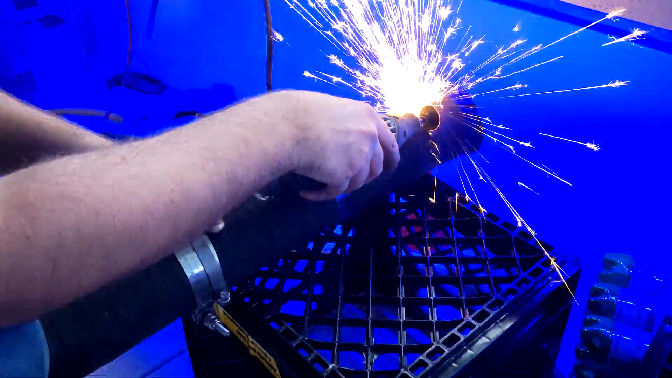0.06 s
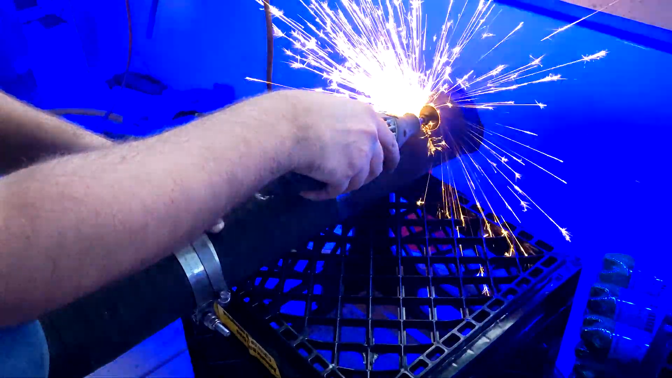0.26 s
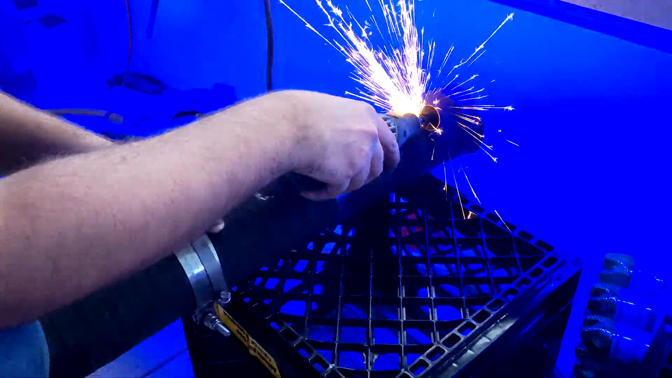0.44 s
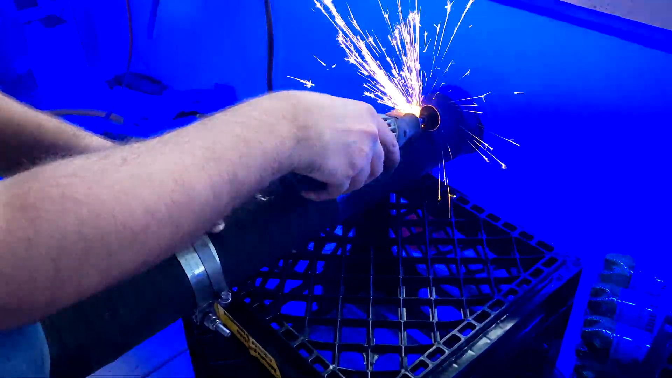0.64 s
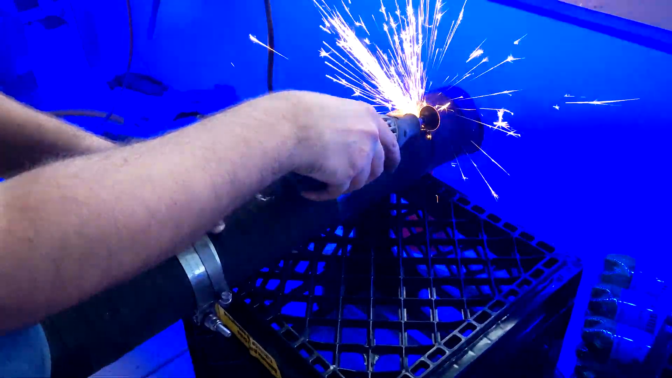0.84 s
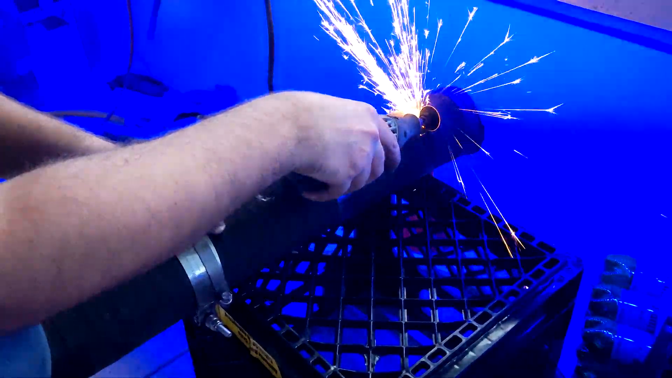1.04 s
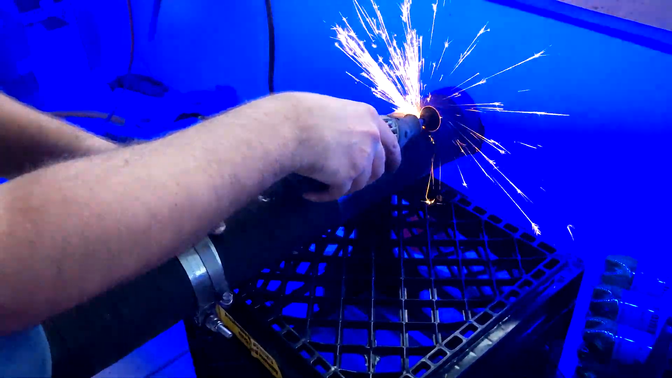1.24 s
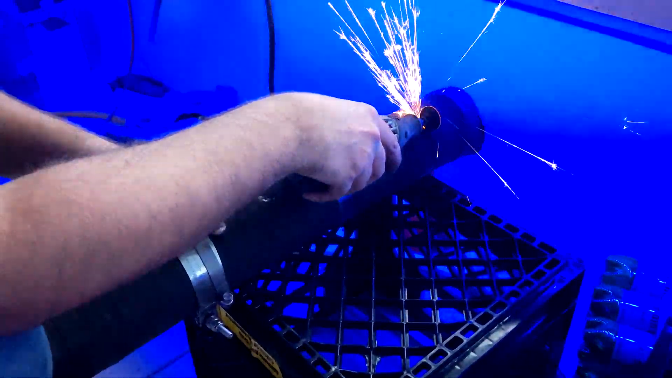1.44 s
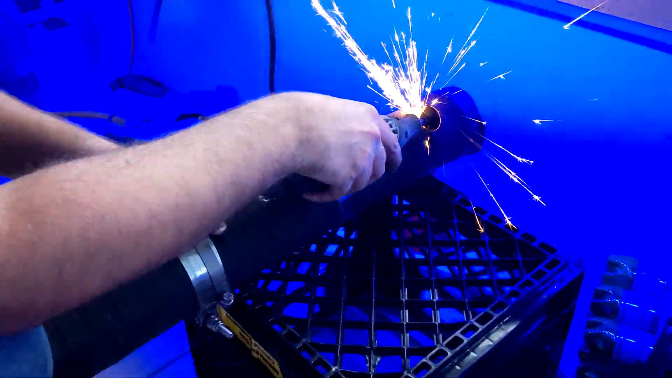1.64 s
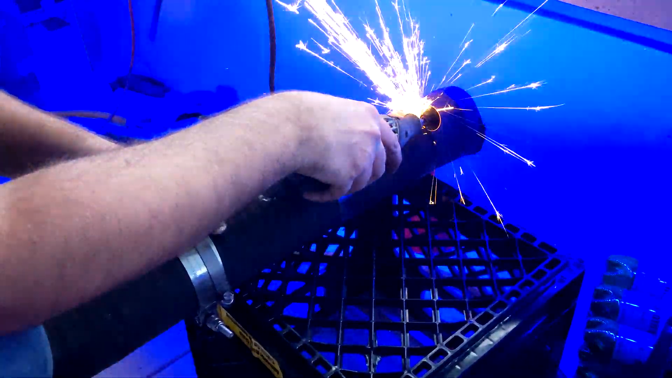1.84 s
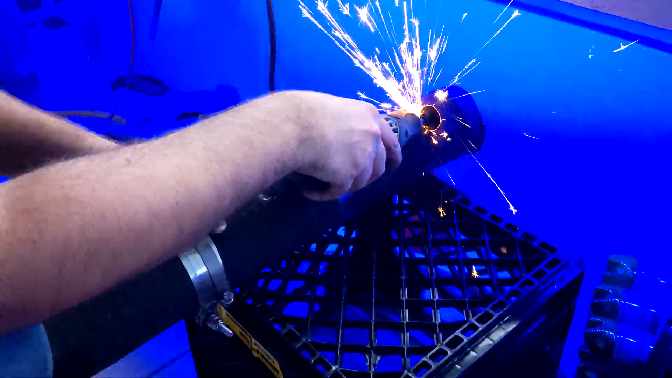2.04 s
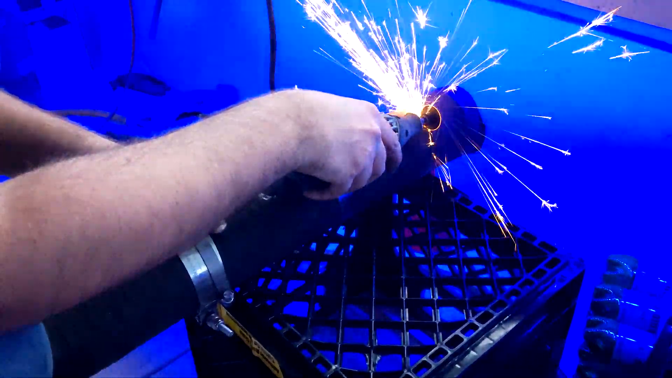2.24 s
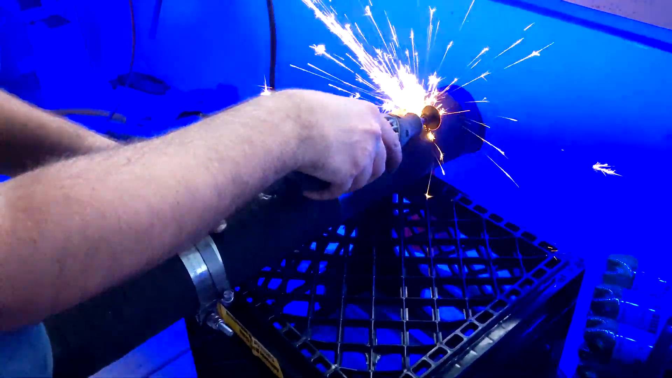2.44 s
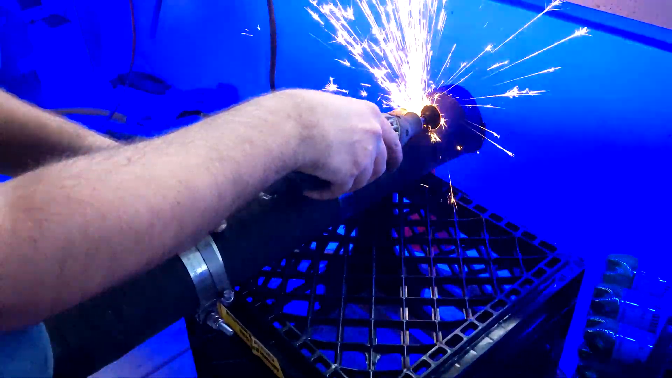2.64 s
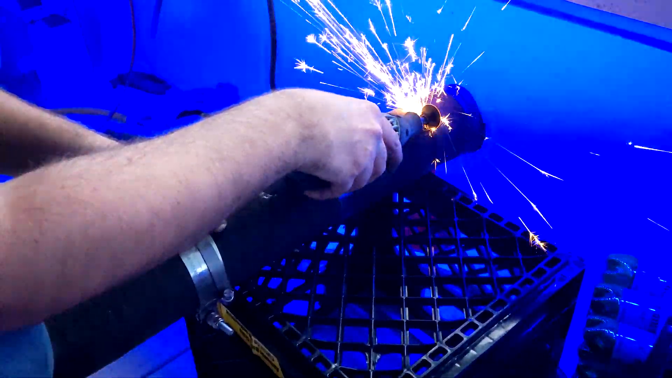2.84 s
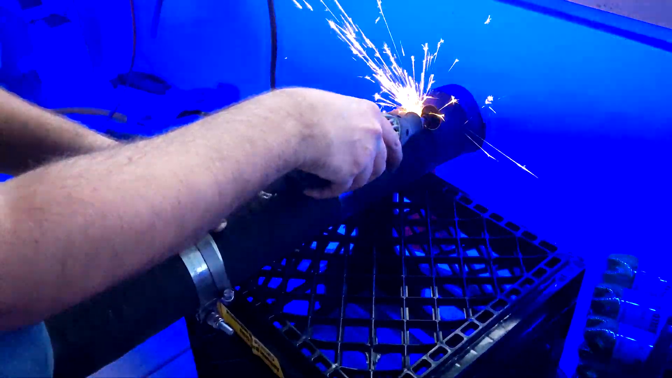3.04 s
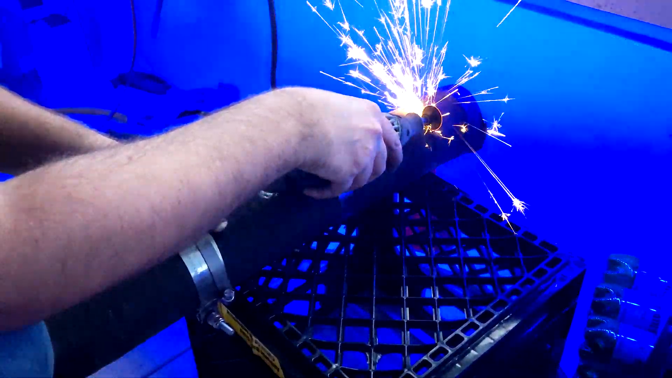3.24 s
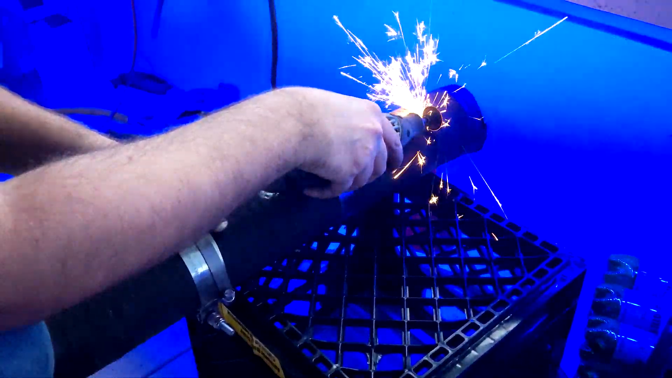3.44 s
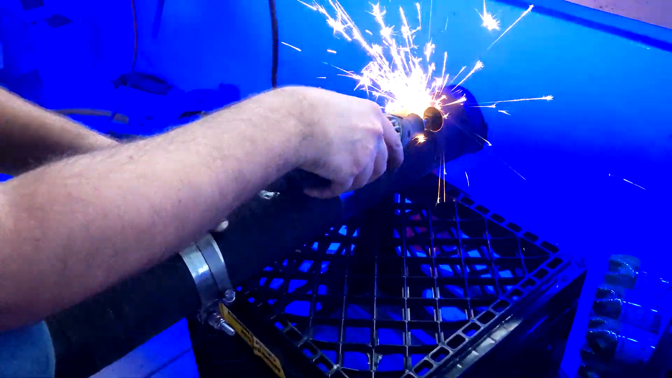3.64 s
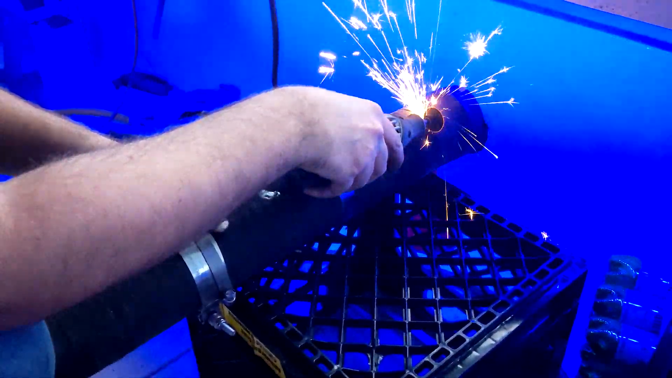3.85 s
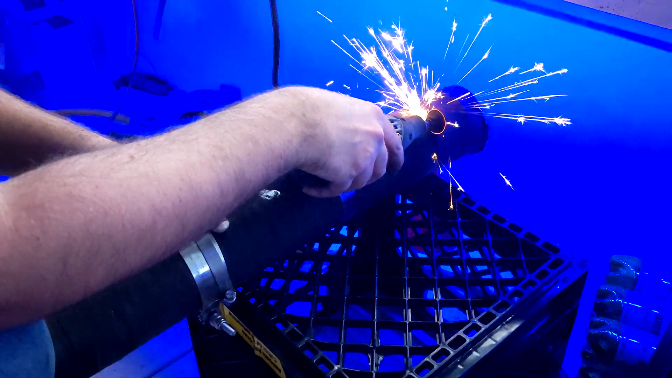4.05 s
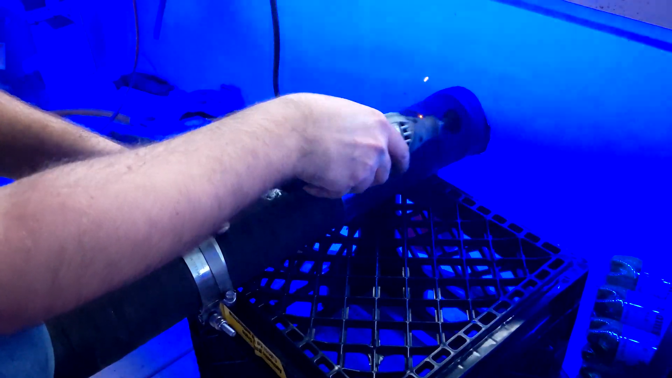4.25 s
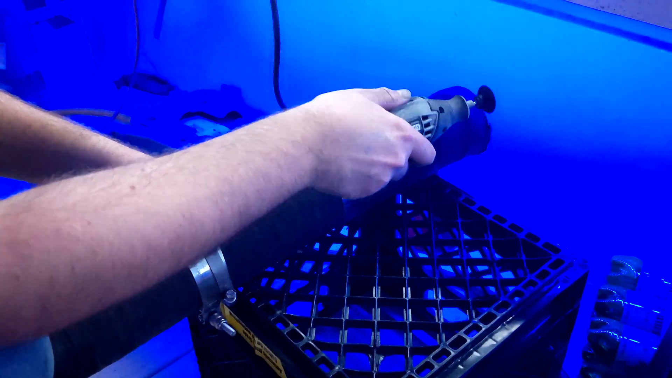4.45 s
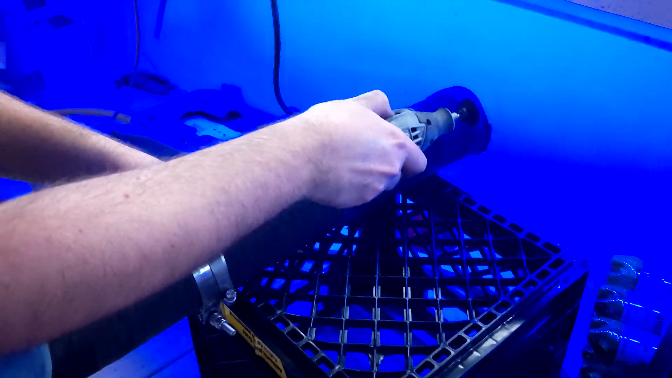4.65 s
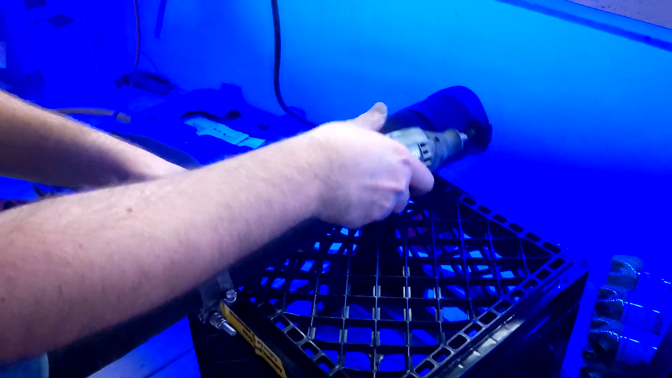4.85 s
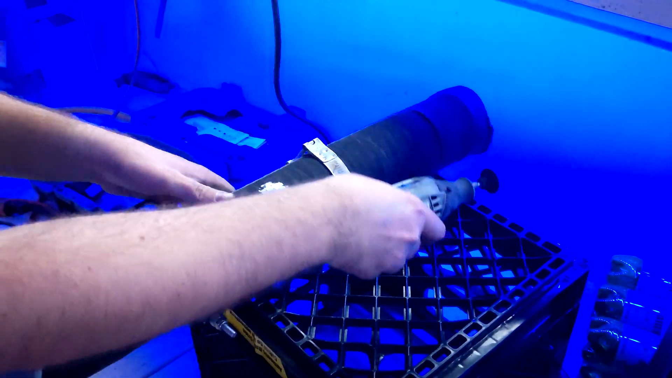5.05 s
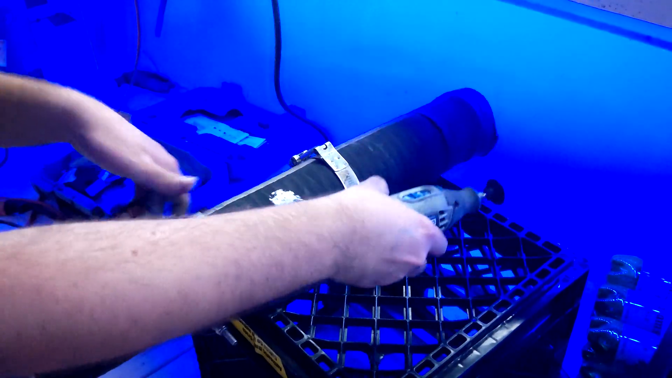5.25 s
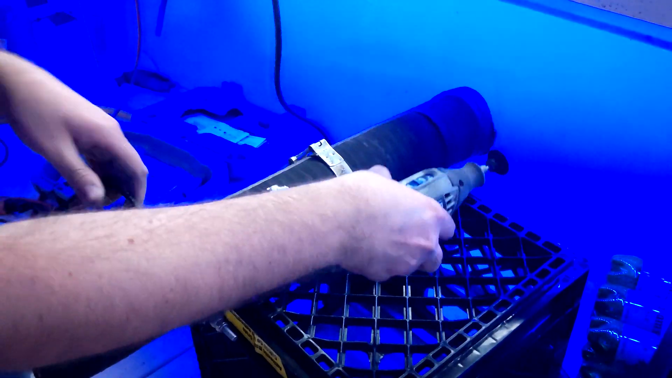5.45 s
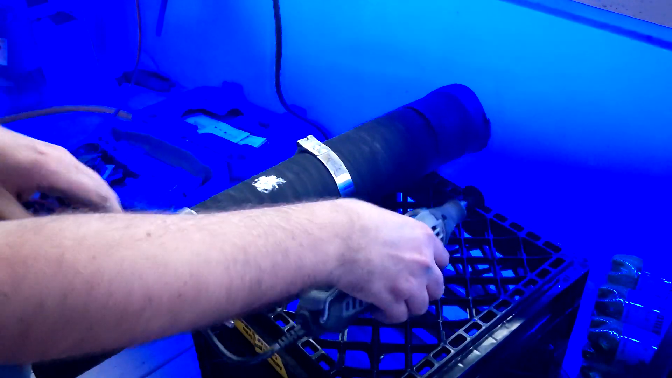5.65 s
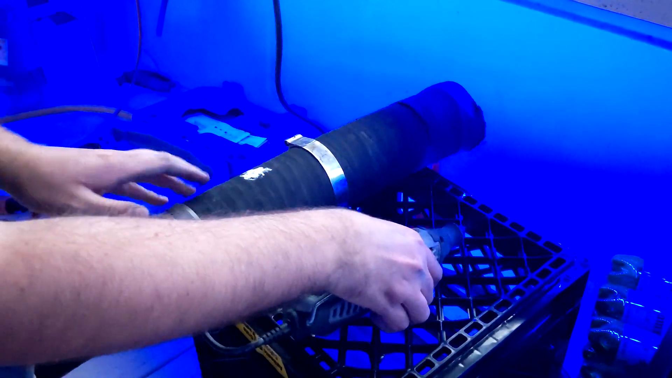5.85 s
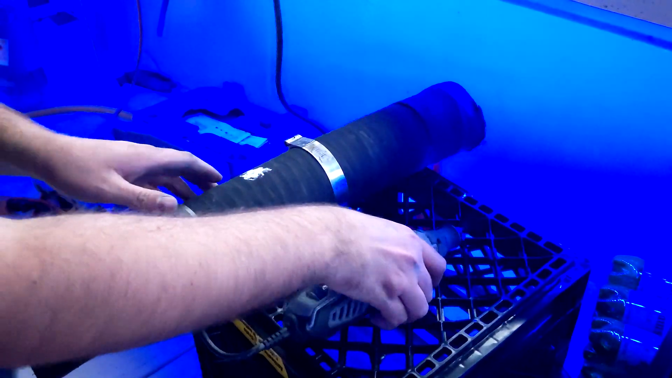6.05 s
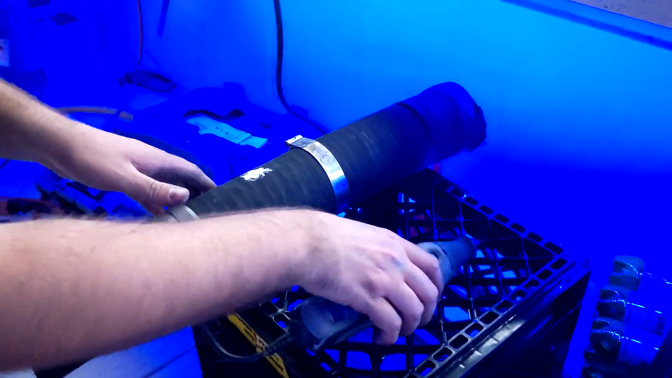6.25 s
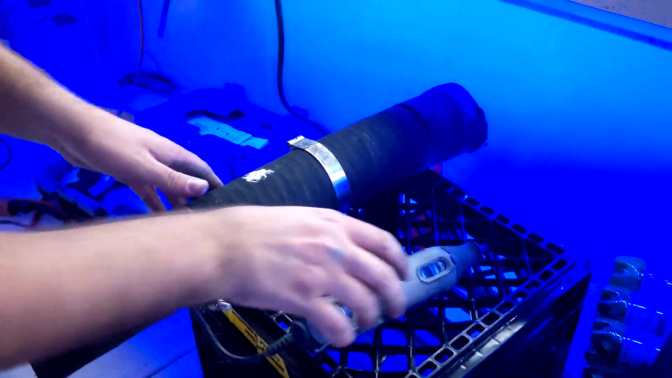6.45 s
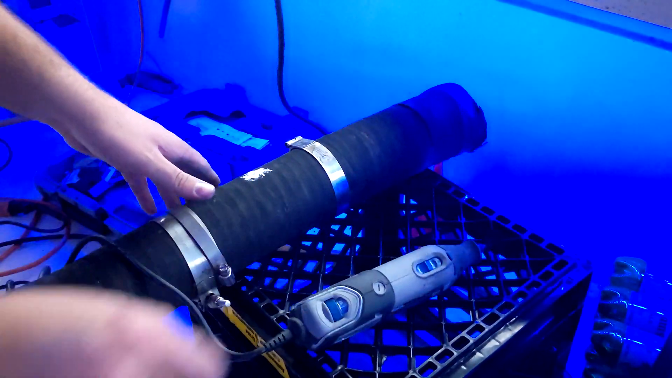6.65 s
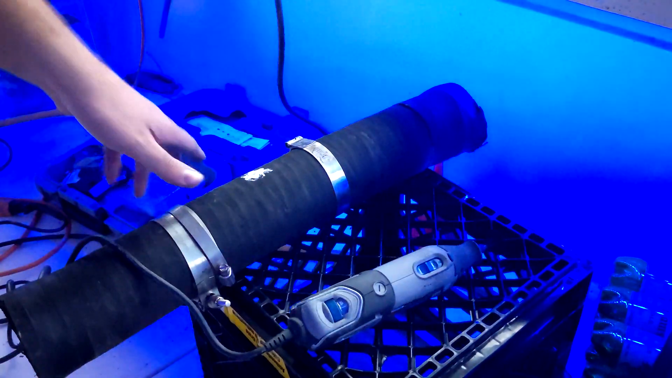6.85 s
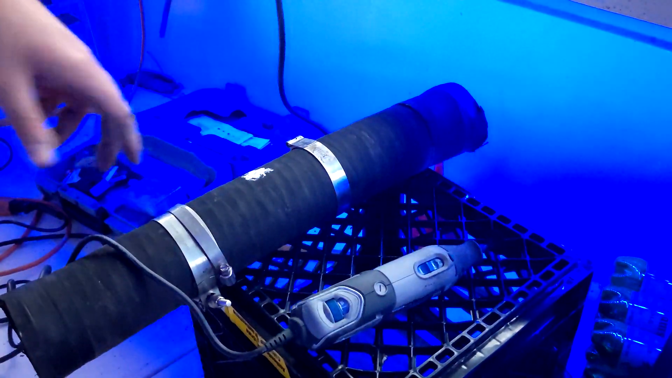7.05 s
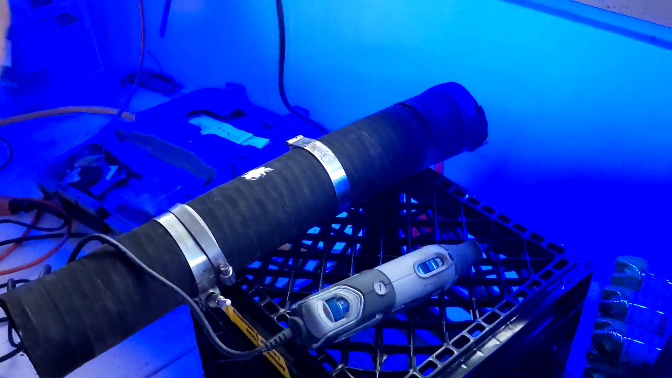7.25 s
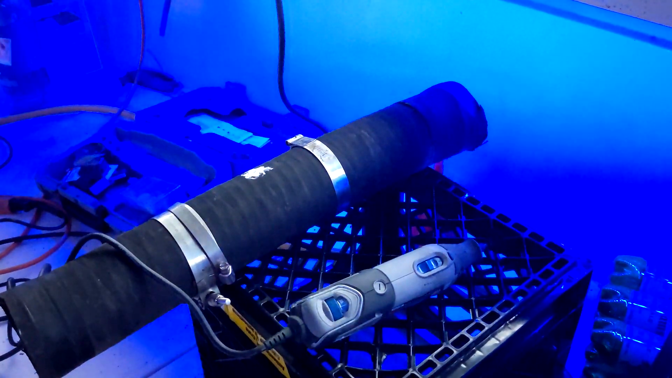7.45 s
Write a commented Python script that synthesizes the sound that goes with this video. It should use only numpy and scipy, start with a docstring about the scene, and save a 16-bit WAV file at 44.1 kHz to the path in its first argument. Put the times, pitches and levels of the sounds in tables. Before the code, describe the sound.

A handheld rotary tool cuts a wire-wound rubber hose with harsh, gritty grinding over a high motor whine that wavers under the load. After about four seconds the grinding stops and the motor races briefly. Switched off, it winds down in a falling whine and airy hiss, ending in small scrapes and soft knocks as it is laid on a plastic crate. The sound is close, in a small quiet room.

```python
"""Harsh grinding over a motor whine: a hand-held rotary tool cuts a wire-wound rubber hose on a crate.
The out-of-round wheel repeats one bite each turn, grit tears off, and the load sags the speed.
Lifted out, the rotor races; switched off, it coasts down, its whine falling through fan air and hiss.
The brushes scrape over the last turns as the tool is laid on the plastic crate in a small quiet room."""
import sys
import numpy as np
from scipy import signal
from scipy.fft import rfft, irfft
from scipy.io import wavfile
from scipy.ndimage import uniform_filter1d

SR = 44100
rng = np.random.default_rng(int(sys.argv[2]) if len(sys.argv) > 2 else 0)


def dump(signal):
    """Clip the signal to [-1, 1] and save it as 16-bit WAV at the path in sys.argv[1]."""
    limited = np.clip(np.atleast_2d(signal).T, -1, 1)
    pcm = np.round(limited * 32767).astype(np.int16)
    wavfile.write(sys.argv[1], SR, pcm)


N = 330750
LIFT_S, OFF_S, IDLE_HZ = 4.19, 4.71, 414.2
CUTTING, FREED = slice(0, round(4.4 * SR)), slice(round(4.0 * SR), round(6.3 * SR))

# One turn's bite, for five holds of the tool: (shaft order [1], relative level [dB])
BITE_ENTERING = [(1, -20.2), (2, -22), (3, -24.5), (4, -22.5), (5, -20.5), (6, -20), (7, -18), (8, -5.4),
                 (9, -19.5), (10, -19.5), (11, -17.5), (12, -14.5), (13, -13.5), (14, -21), (15, -18),
                 (16, -13.5), (17, -11), (18, -14.5), (19, -15), (20, -15.5), (21, -16), (22, -11),
                 (23, -12), (24, -6), (25, -25), (26, -15), (27, -21), (28, -13.5), (29, -8), (30, -8.5),
                 (31, 0.5), (32, -9.5), (33, -7), (34, -0.5), (35, -1), (36, -3), (37, -8.5), (38, -6),
                 (39, -3.5), (40, -18)]
BITE_SETTLING = [(1, -21.8), (2, -24), (3, -29), (4, -21), (5, -19), (6, -26), (7, -24.5), (8, -3.0),
                 (9, -22.5), (10, -19), (11, -17.5), (12, -18.5), (13, -15.5), (14, -19), (15, -15.5),
                 (16, -10.5), (17, -8), (18, -4), (19, -13.5), (20, -20.5), (21, -14.5), (22, -14.5),
                 (23, -11.5), (24, -9), (25, -20), (26, -15.5), (27, -20), (28, -12.5), (29, -10),
                 (30, -6.5), (31, -5), (32, -7), (33, -9.5), (34, -1.5), (35, -8), (36, -2), (37, -4.5),
                 (38, -7), (39, -12), (40, -30.5)]
BITE_SHALLOW = [(1, -22.8), (2, -24.5), (3, -29), (4, -19.5), (5, -26), (6, -26.5), (7, -21), (8, -7.4),
                (9, -29), (10, -19), (11, -12.5), (12, -14.5), (13, -18), (14, -15), (15, -10.5),
                (16, -5.5), (17, -4.5), (18, -6), (19, -8), (20, -13), (21, -15), (22, -8.5), (23, -9.5),
                (24, -7.5), (25, -18), (26, -17.5), (27, -10.5), (28, -21.5), (29, -5), (30, -2.5),
                (31, -20.5), (32, 1.2), (33, -8.5), (34, 0.3), (35, -12), (36, -7), (37, -3.5), (38, -4),
                (39, -13.5), (40, -30)]
BITE_DEEP = [(1, -18.7), (2, -19), (3, -25.5), (4, -18), (5, -26.5), (6, -20.5), (7, -18), (8, -5.0),
             (9, -21.5), (10, -19.5), (11, -12.5), (12, -18.5), (13, -14), (14, -24), (15, -9.5), (16, -22),
             (17, -10), (18, -10.5), (19, -14), (20, -22.5), (21, -26), (22, -11), (23, -10.5), (24, -7.5),
             (25, -17.5), (26, -10), (27, -24), (28, -15), (29, -13), (30, -4), (31, -8.5), (32, -16),
             (33, 2), (34, -9.5), (35, -1.5), (36, -2.5), (37, -15.5), (38, -5.5), (39, -17), (40, -8.5)]
BITE_THROUGH = [(1, -23.5), (2, -26), (3, -24.5), (4, -11.5), (5, -12.5), (6, -11), (7, -24.5), (8, -7.6),
                (9, -23), (10, -17.5), (11, -18), (12, -3.5), (13, -11.5), (14, -21.5), (15, -16.5),
                (16, -14.5), (17, -9), (18, -2.5), (19, -12.5), (20, -14.5), (21, -12), (22, -4.5),
                (23, -13), (24, -10), (25, -21.5), (26, -20), (27, -22.5), (28, -12), (29, -1.2), (30, -2),
                (31, -4.5), (32, -6), (33, -13), (34, -5), (35, -4.5), (36, -4), (37, -11), (38, -7.5),
                (39, -12.5), (40, -31)]
SETTLING_S, SHALLOW_S, DEEP_S, THROUGH_S = (0.575, 1.1), (1.38, 1.86), (1.86, 2.61), (3.137, 4.013)
def wheel_bite(hz, turns):
    """The out-of-round wheel repeats one pattern a turn; each hold has its own overtones."""
    bites = np.array([BITE_ENTERING, BITE_SETTLING, BITE_SHALLOW, BITE_DEEP, BITE_THROUGH])
    orders, spectra = bites[0, :, 0], amp(bites[:, :, 1])
    spectra[:, [0, 7]] = 0  # orders 1 and 8 belong to the motor
    spectra /= np.linalg.norm(spectra, axis=1, keepdims=True)
    held = [fade(a, .16) - fade(b, .16) for a, b in (SETTLING_S, SHALLOW_S, DEEP_S, THROUGH_S)]
    shares = np.clip([1 - sum(held)] + held, 0, 1)  # entering fills the gaps
    gains = (np.sqrt(per_hold ** 2 @ shares[:, CUTTING]) for per_hold in spectra.T)
    entering = np.interp(np.arange(0, N + 512, 256), np.arange(N), shares[0])
    chatter_db = 2.6 + 1.2 * entering
    surging = turns + .0022 * np.sin(mains())  # current pulses kick the shaft
    skip = 1 + .11 * shares[4] * np.cos(np.pi * turns)  # nearly through: alternate turns bite harder
    return skip * tones(orders, gains, hz, surging, chatter_db, drift_hz=45, flutter_rad=.45, span=CUTTING)


# Wheel in the hose: (time [s], unbalance [dB], slot whine [dB], grinding [dB])
CUT_LEVELS = [(0.0, -38, -25.5, -17.5), (0.2, -40.5, -26.5, -16), (1.14, -46, -25, -15),
              (1.69, -44.5, -32.5, -15), (1.8, -46.5, -28.5, -17.5), (2.02, -42.5, -27, -15.5),
              (2.6, -39.5, -27.5, -15.5), (2.71, -43.5, -30.5, -15.5), (3.19, -46, -26, -16),
              (3.29, -47, -39.5, -16.5), (3.6, -52, -26, -14.5), (3.97, -41, -31.5, -14),
              (4.08, -39.5, -27, -15.5), (4.17, -45, -44, -17)]
# Grit spectrum: (frequency [Hz], relative density [dB])
GRIT_SPECTRUM = [(35, -67), (60, -52), (340, -19.5), (460, -17), (800, -11), (1250, -21.5), (2300, -3.5),
                 (2600, -13), (3200, -1.5), (3800, -6), (5500, -2.5), (7000, -1.5), (9000, 0), (10900, -2),
                 (11900, 0.5), (13500, 2), (15900, -7.5)]
def grinding(hz, turns):
    """The bite plus one burst of tearing grit a turn; each turn is randomly harder or softer."""
    bite = wheel_bite(hz, turns)
    hardness, tearing = rng.standard_normal((2, 3000))[:, turns.astype(int)]
    bite *= unit_rms(uniform_filter1d(amp(1.1 * hardness), size=30))
    tears = unit_rms(1.4 + amp(2.4 * (hardness + tearing)) * np.exp(-(turns % 1) / .25))
    grit = noise(GRIT_SPECTRUM, TOOL_WIDTH, tears) * flicker(depth_db=1, rate_hz=40)
    _, _, level_db = curves(CUT_LEVELS)
    return amp(level_db) * (amp(-.8) * bite + amp(-7.5) * grit) * (1 - fade(LIFT_S, .014))


# Shaft under load: (time [s], speed [Hz])
LOADED_SPEED = [(0.0, 393), (.1, 389), (.29, 400.5), (.49, 392.3), (.69, 400.1), (.9, 396.7), (1.01, 398.3),
                (1.15, 395.7), (1.32, 400.3), (1.42, 398), (1.63, 401.3), (1.73, 399), (2.06, 389.6),
                (2.29, 389.8), (2.38, 389), (2.55, 392.3), (2.72, 386.3), (2.93, 394.6), (3.06, 390.7),
                (3.28, 401), (3.46, 397.7), (3.75, 398.3), (3.96, 400.4), (4.06, 394.5), (4.19, 410)]
RUNAWAY_S, RUNAWAY_HZ = 4.31, 437.8
DRAG_PER_S, FRICTION_HZ_PER_S, FLOOR_HZ = .29, 180, 5
def shaft():
    """Speed [Hz] and turns: sags under load, overshoots when freed, coasts against drag and friction."""
    driven, = curves(list(LOADED_SPEED) + [(RUNAWAY_S, RUNAWAY_HZ), (OFF_S, IDLE_HZ)])
    friction_hz = FRICTION_HZ_PER_S / DRAG_PER_S
    hz = (driven + friction_hz) * np.exp(-DRAG_PER_S * since(OFF_S)) - friction_hz
    hz = uniform_filter1d(np.maximum(hz, FLOOR_HZ), size=1500)  # inertia
    return hz, np.cumsum(hz) / SR


# Resonance of the tool in the hand: (frequency [Hz], width [Hz], gain [dB])
GRIP_MODES = [(259.4, 18, 16)]
# Free wheel's unbalance overtones: (shaft order [1], relative level [dB])
WOBBLE_ORDERS = [(2, -22.5), (3, -11), (4, -30)]
RADIATING_HZ = 236.4
def unbalance(hz, turns):
    """The wheel shakes the tool once a turn; slow shaking hardly radiates."""
    free = fade(LIFT_S, .2)
    cut_db, _, _ = curves(CUT_LEVELS)
    free_db = -35.5 + 18.5 * np.log2(hz / IDLE_HZ)
    radiating = np.minimum(hz / RADIATING_HZ, 1)
    shake_db = cut_db * (1 - free) + (free_db + 24 * np.log2(radiating)) * free
    shake = amp(shake_db) * resonance(hz, GRIP_MODES, floor_db=0)
    out = tones([1], [shake], hz, turns, drift_db=2, drift_hz=10)
    wobble = amp(free_db) * free * radiating ** 8 * resonance(hz, GRIP_MODES, floor_db=7.5)
    orders, levels_db = np.transpose(WOBBLE_ORDERS)
    gains = (amp(db) * wobble for db in levels_db)
    return out + tones(orders, gains, hz, turns, drift_db=2.5, drift_hz=33, span=FREED)


def loaded_whine(hz, turns):
    """Eight rotor slots whine in the cut; current pulses shake level and phase."""
    _, whine_db, _ = curves(CUT_LEVELS)
    gain = amp(whine_db) * (1 - fade(LIFT_S, .2)) * (1 + .3 * np.cos(mains()))
    swing = -.081 * np.sin(mains()[CUTTING])
    return tones([8], [gain], hz, turns, drift_db=1.5, drift_hz=60, swing_rad=swing, span=CUTTING)


# Wheel free: (time [s], slot whine [dB], air and brush hiss [dB])
FREE_LEVELS = [(4.2, -27.5, -25), (4.31, -26.5, -20.5), (4.56, -23.5, -20), (4.69, -38, -20),
               (4.8, -50, -21.5), (4.93, -31, -20.5), (5.08, -37, -22), (5.29, -52, -20.5),
               (5.49, -38.5, -26), (5.7, -43, -28.5), (5.87, -41.5, -30), (6.13, -42, -34.5),
               (6.33, -41, -28)]
# Free rotor's whine: (shaft order [1], relative level [dB])
SLOT_ORDERS = [(8, -1.5), (12, -16), (16, -7.5), (32, -12.5), (40, -9.5), (48, -9.5), (56, -10),
               (64, -11.5), (72, -14.5), (80, -18), (88, -15), (96, -14), (104, -16.5), (112, -15.5)]
# Casing resonances: (frequency [Hz], width [Hz], gain [dB])
CASE_MODES = [(1277, 320, -5), (2060, 570, 3), (2955, 460, 7), (3320, 47, 3), (3890, 550, 2.5),
              (4500, 500, 4), (5180, 550, 1), (7550, 1300, 6), (9750, 3500, 4.5)]
DIP_DB, DIP_END_S = -16, 5.39
def free_whine(hz, turns):
    """Slot whine and commutator whistle fall through the casing's modes; upper tones dip briefly."""
    uneven = 1 + .5 * np.cos(2 * np.pi * turns) + .085 * np.cos(4 * np.pi * turns)  # unequal slots
    envelope = uneven * fade(LIFT_S, .2) * (1 - fade(6.13, .15))
    whine_db, _ = curves(FREE_LEVELS)
    dip = amp(DIP_DB * (fade(4.78, .1) - fade(DIP_END_S, .059)))
    orders, levels_db = np.transpose(SLOT_ORDERS)
    gains = []
    for order, db in zip(orders, levels_db):
        casing = resonance(order * hz, CASE_MODES, floor_db=-20.5) * np.minimum(order * hz / 1500, 1) ** 2
        gains.append(amp(db + whine_db) * casing * envelope * (dip if order > 8 else 1))
    out = tones(orders, gains, hz, turns, drift_db=2.2, drift_hz=140, flutter_rad=1, span=FREED)
    whistle_db = -34 + 9 * np.log2(hz / IDLE_HZ) + DIP_DB * (fade(5.2, .1) - fade(DIP_END_S, .056))
    whistle = amp(whistle_db) * resonance(24 * hz, CASE_MODES, floor_db=-8.5) * envelope
    return out + tones([24], [whistle], hz, turns, drift_db=3.5, drift_hz=110, flutter_rad=.58, span=FREED)


# Rattle spectrum: (frequency [Hz], relative density [dB])
BUZZ_SPECTRUM = [(600, -40), (950, -10.5), (1250, 1.5), (1450, -10), (2200, -42.5)]
def current_buzz(turns):
    """Current pulses hum, drive a rattle and beat with the shaft; all fade as the load goes."""
    load = amp(-5 * fade(LIFT_S, .2)) * (1 - fade(4.4, .051))
    pulses = unit_rms(1.2 + np.exp(np.cos(mains())))
    out = amp(-40.5) * noise(BUZZ_SPECTRUM, TOOL_WIDTH) * pulses
    out[0] += amp(-66) * flicker(depth_db=3.4, rate_hz=24) * np.sqrt(2) * np.sin(mains())
    for offset, db in ((-1, -61.5), (.99, -59.5)):
        sideband = np.sin(2 * np.pi * turns + offset * mains())
        out[0] += amp(db) * flicker(depth_db=4, rate_hz=60) * sideband
    return load * out


# Fan air at full speed, brush hiss at low speed: (frequency [Hz], relative density [dB])
FAN_SPECTRUM = [(35, -63), (60, -47), (371, -24.5), (407, -35), (491, -21.5), (1280, -12), (1610, -15),
                (3250, -6.5), (4400, -6), (5160, -6.5), (5960, -8), (6820, -3), (7600, -2.5), (10900, -5.5),
                (13800, -0.5), (15900, -4.5)]
BRUSH_SPECTRUM = [(35, -48), (60, -34), (274, -19), (539, -25), (859, -17.5), (1500, -16), (2290, -7),
                  (3000, -5.5), (3600, -6.5), (4500, -5), (5560, -8), (7190, -0.5), (10400, -4.5),
                  (14800, 7), (15900, 4.5)]
def air(hz, turns):
    """Fan air gives way to brush hiss as the rotor slows; both throb once a turn."""
    fast = np.clip((hz - 150) / 200, 0, 1)
    fan = np.sqrt(fast) * noise(FAN_SPECTRUM, TOOL_WIDTH)
    brushes = np.sqrt(1 - fast) * noise(BRUSH_SPECTRUM, TOOL_WIDTH)
    throb = 1 + .038 * np.cos(2 * np.pi * turns)
    _, level_db = curves(FREE_LEVELS)
    return amp(level_db) * (fan + brushes) * throb * fade(LIFT_S - .015, .025) * (1 - fade(6.325, .016))


# Brush catches: (time [s], relative peak [dB])
SCRAPE_EVENTS = [(6.168, -29), (6.1874, -31), (6.2084, -22), (6.2352, -13), (6.2594, -21), (6.2934, -13),
                 (6.342, -14), (6.3534, -17), (6.364, -15), (6.3816, -17)]
# Scrape spectrum: (frequency [Hz], relative density [dB])
SCRAPE_SPECTRUM = [(590, -53), (1000, -31), (1830, -31), (2410, -14), (2640, -24), (2970, -13), (5110, -21),
                   (14700, 0), (15900, -4.5)]
def brush_scrapes():
    """The brushes catch on the last turns."""
    return amp(-8) * bursts(SCRAPE_EVENTS, rise_s=.0039, t60_s=.046) * noise(SCRAPE_SPECTRUM, TOOL_WIDTH)


# Tool meeting the crate: (time [s], blow [dB], gain above 900 Hz [dB])
KNOCK_EVENTS = [(5.951, -54, -10), (6.068, -43.5, -5), (6.325, -49, 7)]
# Crate modes: (frequency [Hz], level [dB], t60 [s])
CRATE_MODES = [(540, -2, 0.14), (650, -3, 0.07), (820, 5, 0.099), (1000, 5, 0.06), (1410, 0.1, 0.04),
               (1900, 0.1, 0.04)]
def crate_knocks():
    """Each blow rings the crate's modes, left of centre."""
    out, t = np.zeros(N), np.arange(6000) / SR
    attack = np.minimum(t / .00089, 1)
    for start_s, blow_db, upper_db in KNOCK_EVENTS:
        for hz, db, t60_s in CRATE_MODES:
            envelope = attack * amp(blow_db + db + upper_db * (hz > 900) - 60 * t / t60_s)
            out[round(start_s * SR):][:len(t)] += envelope * np.sin(2 * np.pi * (hz * t + rng.random()))
    return out * np.array([[1], [.25]])


def crate_rumble():
    """The crate rumbles as it takes the weight."""
    rumble = noise([(50, -22), (90, -8), (145, .1), (240, -9), (400, -33)], TOOL_WIDTH)
    return rumble * fade(6.12, .1) * amp(-47 - 220 * since(6.18))


# Rustle spectrum: (frequency [Hz], relative density [dB])
RUSTLE_SPECTRUM = [(880, -49.5), (1500, -24), (2040, -9), (2390, -6.5), (4070, -10), (4960, -12.5),
                   (11100, -13), (13700, -2), (15900, -16)]
# Faint ticks: (time [s], relative peak [dB])
TICK_EVENTS = [(6.7494, -63), (6.9894, -56), (7.2302, -48)]
def hand_rustle():
    """Hand and cord move, then draw away, with a few faint ticks."""
    rustle = noise(RUSTLE_SPECTRUM, ROOM_WIDTH)
    rustle[1] -= .55 * rustle[0]  # right of centre
    away_db = 4.5 * fade(6.89, .058) + 14 * since(6.89)
    ticks = amp(-13) * bursts(TICK_EVENTS, rise_s=.0019, t60_s=.1)
    return rustle * (amp(-64.5 - away_db) * fade(5.9, .034) + ticks)


def room_echoes(x, t60_s):
    """Sparse decaying reflections of the mid signal, as mid and side."""
    t = np.arange(SR // 3) / SR
    taps = rng.choice([-1., 1.], (2, len(t))) * (rng.random((2, len(t))) < .05)
    taps *= amp(-60 * t / t60_s) * (t > .004)
    return signal.fftconvolve(x[:1], taps / np.linalg.norm(taps[0]), axes=1)[:, :N] * amp([[0], [-4]])


# Room background: (frequency [Hz], relative density [dB])
ROOM_SPECTRUM = [(12, -44), (20, -21), (96, -6), (154, -16), (227, -8), (356, -18), (398, -15), (432, -15),
                 (800, -19.5), (1560, -29.5), (2250, -30.5), (13100, -36.5), (15900, -34.5)]
# Stereo width of the room: (frequency [Hz], side minus mid [dB])
ROOM_WIDTH = [(60, -20.5), (240, -16), (950, 2), (3770, 0), (15000, -1)]
def room_tone():
    """Faint, steady, low noise."""
    return amp(-64.5) * noise(ROOM_SPECTRUM, ROOM_WIDTH)


# Stereo width of the tool: (frequency [Hz], side minus mid [dB])
TOOL_WIDTH = [(60, -15.5), (95, -20), (150, -27.5), (240, -12), (380, -14), (600, -7), (950, 1),
              (1500, -7.5), (2380, -4), (3770, -3.5), (5980, -1.5), (9470, -1), (15000, -3)]
def tones(orders, gains, hz, turns, drift_db, drift_hz, flutter_rad=.37, swing_rad=0, span=slice(0, N)):
    """Wavering sines on shaft orders, as mid and side; one ear leads by a drifting phase."""
    out = np.zeros((2, N))
    for order, gain in zip(orders, gains):
        mid_drift, side_drift, flutter, lead_drift = wander(drift_hz, count=4)
        lead = stretched(rng.choice([-np.pi, np.pi]) / 2 + .5 * lead_drift, span)
        phase = 2 * np.pi * (order * turns[span] + rng.random())
        phase += swing_rad + stretched(flutter_rad * flutter, span)
        width_db = db_at(TOOL_WIDTH, order * hz[::256])
        side_db = width_db + (drift_db * side_drift)[:len(width_db)]
        out[0, span] += gain[span] * stretched(amp(drift_db * mid_drift), span) * np.sin(phase)
        out[1, span] += gain[span] * stretched(amp(side_db), span) * np.sin(phase + lead)
    return np.sqrt(2) * out


def noise(spectrum, width, gate=1):
    """Gated, then coloured noise: mid (rms 1) and an unrelated side."""
    hz = np.fft.rfftfreq(N, 1 / SR)
    bins = rfft(rng.standard_normal((2, N)) * gate) * amp(db_at(spectrum, hz))
    bins[1] *= amp(db_at(width, hz))
    out = irfft(bins, N)
    return out / np.sqrt(np.mean(out[0] ** 2))


def resonance(hz, modes, floor_db):
    """Gain of a resonant body at hz."""
    power = sum(amp(db) ** 2 / (1 + (2 * (hz - f) / width) ** 2) ** 2 for f, width, db in modes)
    return np.sqrt(amp(floor_db) ** 2 + power)


def mains():
    """Phase [rad] of the 120 Hz current pulses."""
    return 2 * np.pi * 120 * np.arange(N) / SR


def bursts(events, rise_s, t60_s):
    """Envelope of short decaying events."""
    return sum(amp(db - 60 * since(s) / t60_s) * np.minimum(since(s) / rise_s, 1) for s, db in events)


def wander(rate_hz, count):
    """Rows of random drift up to rate_hz, rms 1, one value per 256 samples."""
    t, hz = np.arange(0, N + 512, 256) / SR, np.geomspace(rate_hz / 20, rate_hz, num=16)[:, None]
    sines = np.sin(2 * np.pi * (hz * t + rng.random((count, 16, 1)))) / np.sqrt(hz)
    return np.array([unit_rms(row) for row in sines.sum(1)])


def flicker(depth_db, rate_hz):
    """Randomly wavering gain."""
    return stretched(amp(depth_db * wander(rate_hz, count=1)[0]))


def stretched(row, span=slice(0, N)):
    """One value per 256 samples to every sample of span."""
    return np.interp(np.arange(N)[span], np.arange(len(row)) * 256, row)


def curves(table):
    """A time table's value columns, per sample."""
    times, *values = np.transpose(table)
    return [np.interp(np.arange(N) / SR, times, column) for column in values]


def db_at(spectrum, hz):
    """A spectrum table, interpolated in log frequency."""
    f, db = np.transpose(spectrum)
    return np.interp(np.log(hz + 1), np.log(f + 1), db)


def fade(centre_s, width_s):
    """Ramp from 0 to 1."""
    return np.clip((np.arange(N) / SR - centre_s) / width_s + .5, 0, 1)


def since(start_s):
    """Seconds elapsed, 0 before the start."""
    return np.maximum(np.arange(N) / SR - start_s, 0)


def amp(db):
    """dB to gain."""
    return 10 ** (np.asarray(db) / 20)


def unit_rms(x):
    """Scales to rms 1."""
    return x / np.sqrt(np.mean(x ** 2) + 1e-20)


def scene():
    """Sums the sources as mid and side; returns left and right."""
    hz, turns = shaft()
    near = air(hz, turns) + brush_scrapes() + crate_knocks() + crate_rumble() + hand_rustle()
    near += amp(-6.5) * room_echoes(near, t60_s=.18)
    wheel = grinding(hz, turns)
    motor = unbalance(hz, turns) + loaded_whine(hz, turns) + free_whine(hz, turns) + current_buzz(turns)
    mid, side = wheel + motor + near + room_tone()
    return np.array([mid + side, mid - side])


def record(dry):
    """Microphone: 45 Hz high-pass, peak clipping, 15950 Hz band limit."""
    high_pass = signal.butter(2, 45, "high", fs=SR, output="sos")
    low_pass = signal.firwin(511, 15950, window=("kaiser", 9), fs=SR)
    clipped = np.clip(signal.sosfilt(high_pass, dry), -1, 1)
    return signal.oaconvolve(clipped, low_pass[None], "same")


dry = scene()
out = record(dry)
dump(out)
```